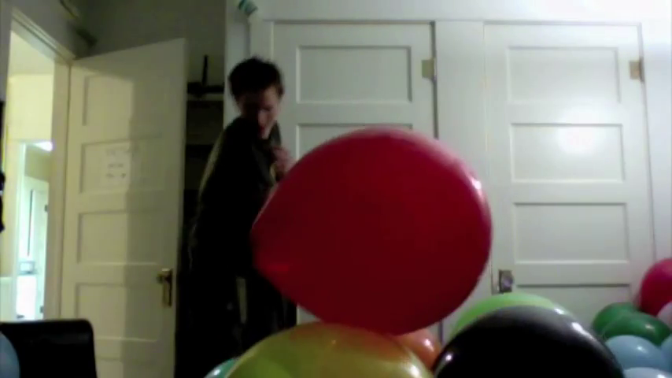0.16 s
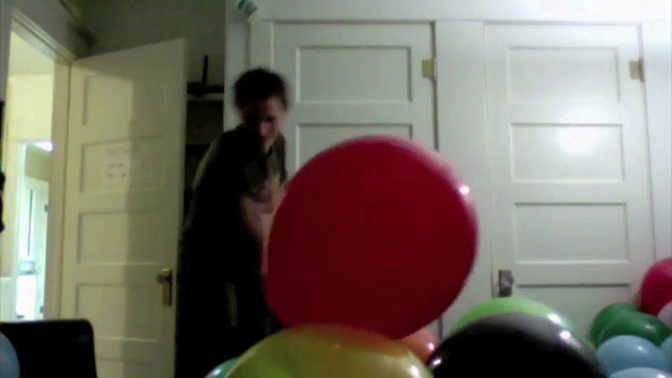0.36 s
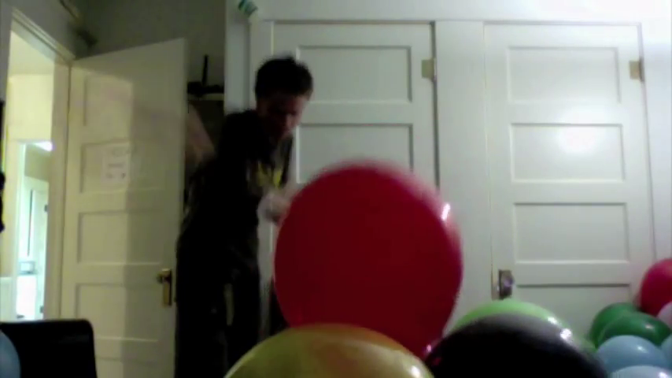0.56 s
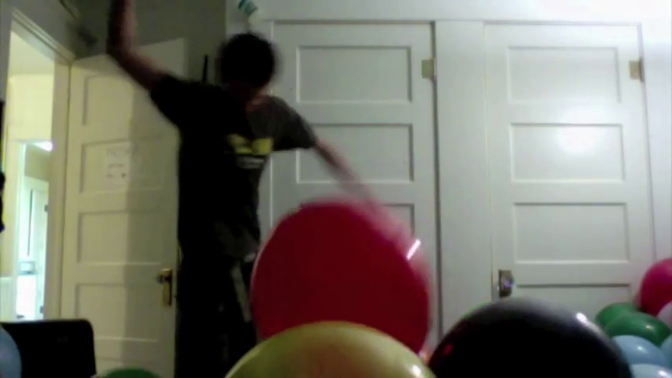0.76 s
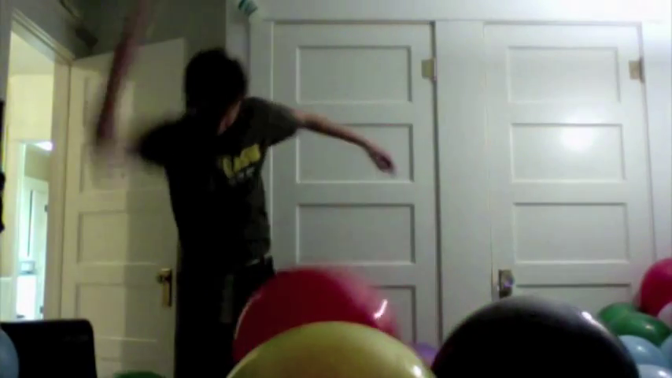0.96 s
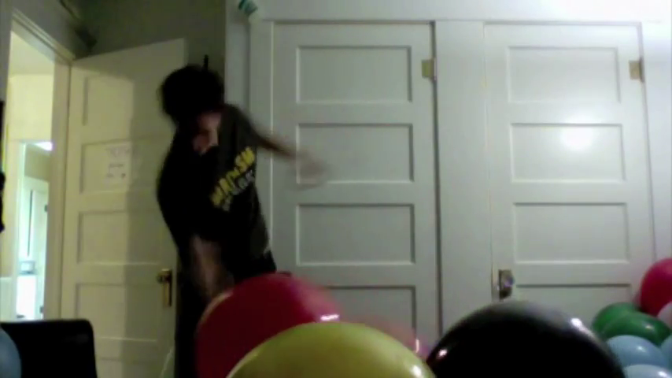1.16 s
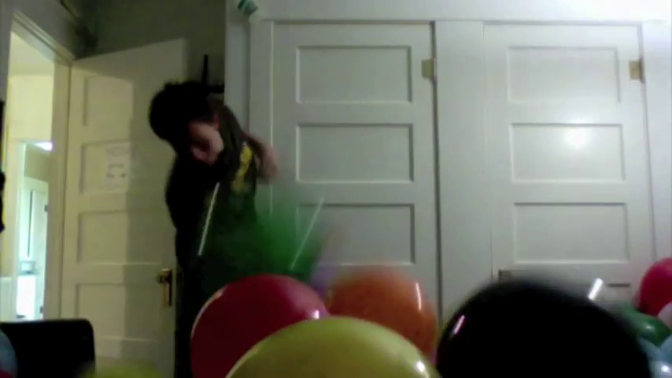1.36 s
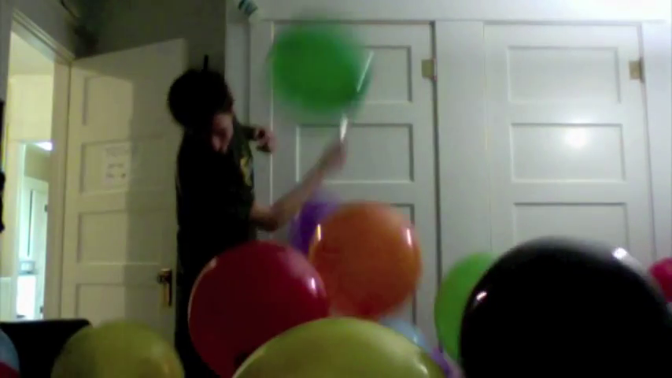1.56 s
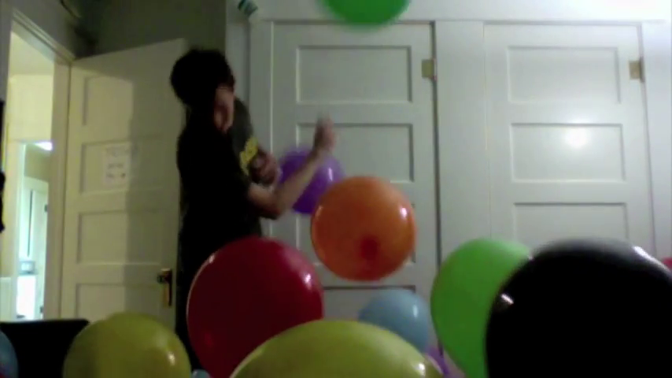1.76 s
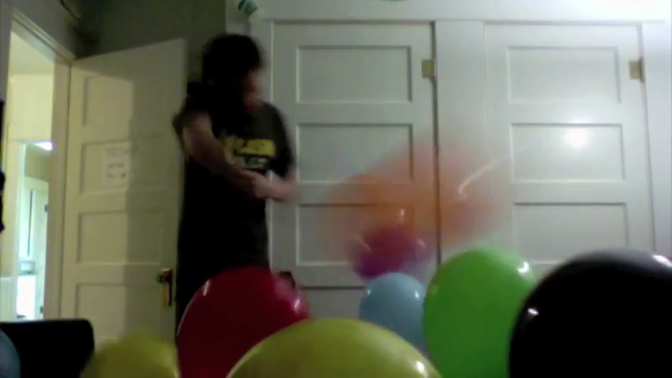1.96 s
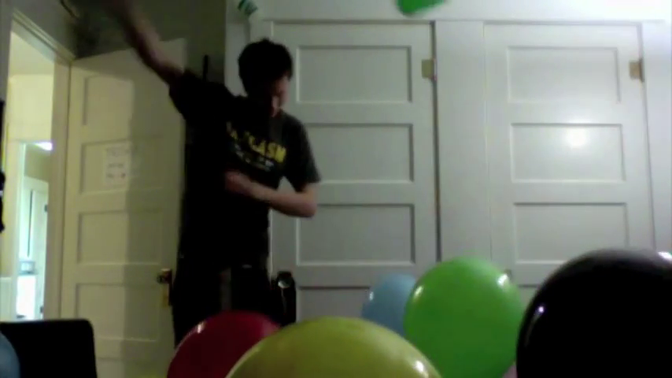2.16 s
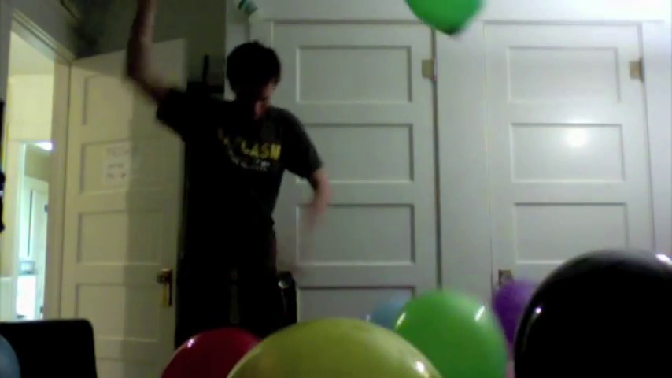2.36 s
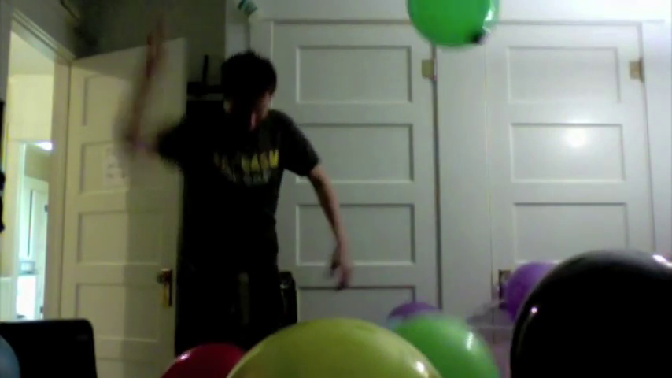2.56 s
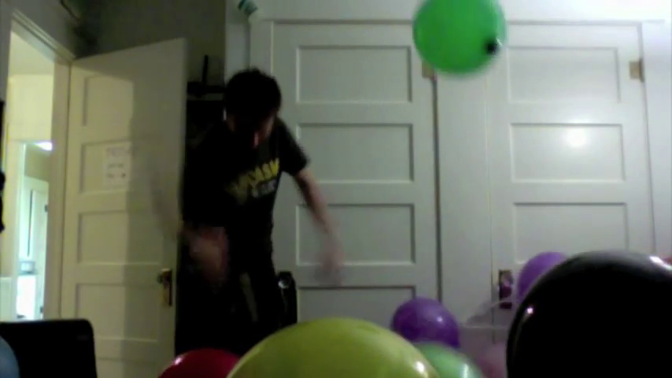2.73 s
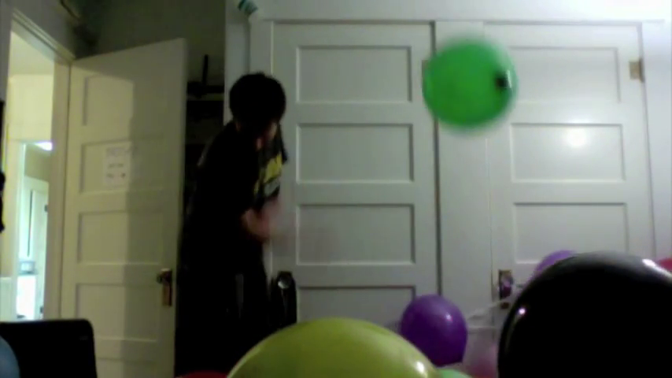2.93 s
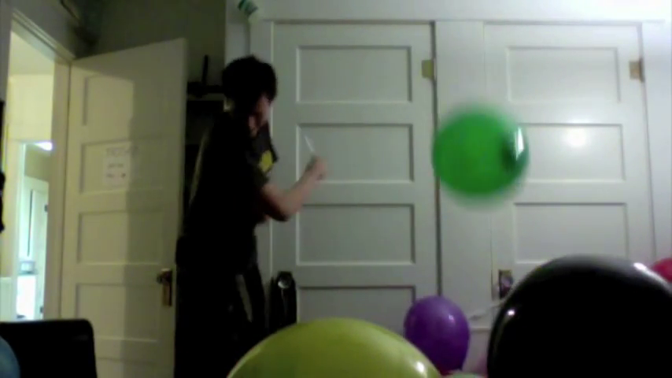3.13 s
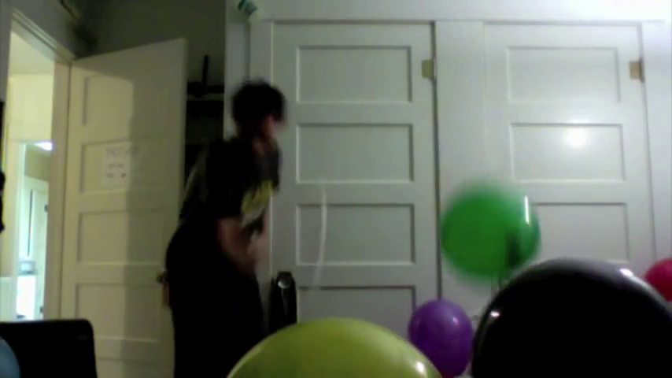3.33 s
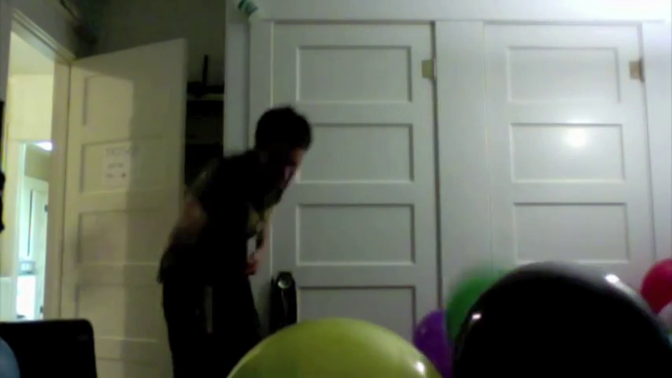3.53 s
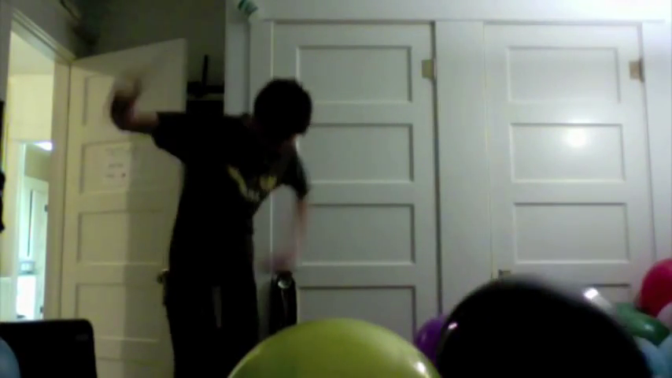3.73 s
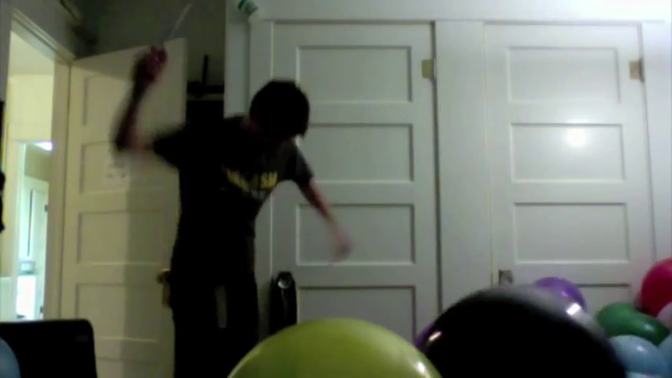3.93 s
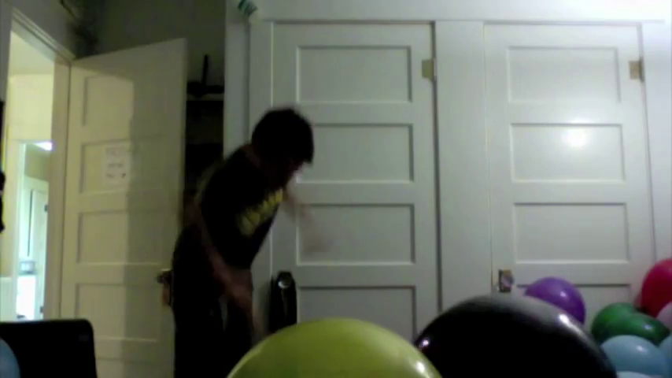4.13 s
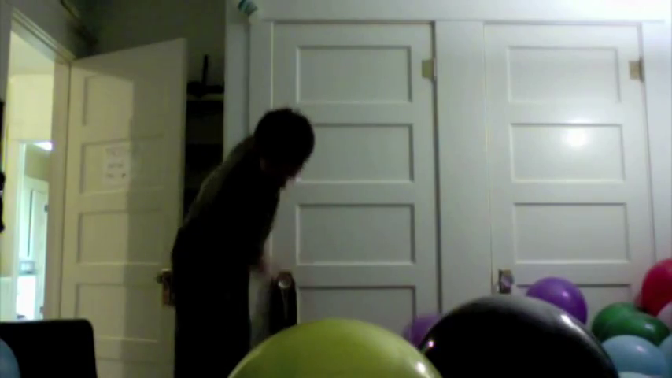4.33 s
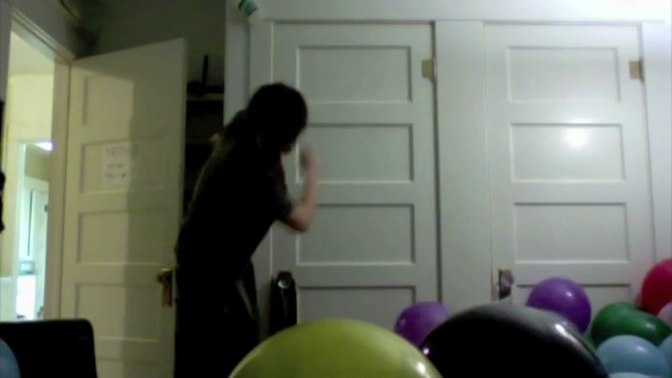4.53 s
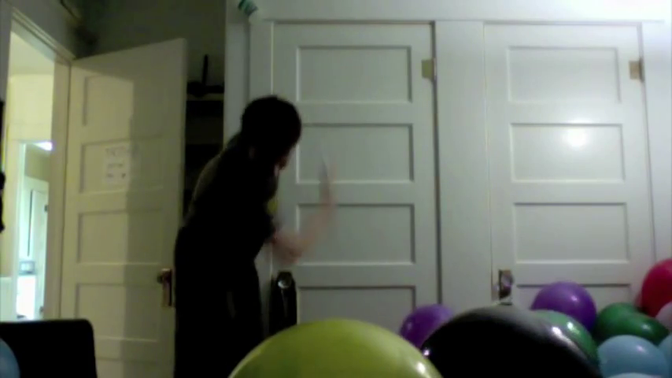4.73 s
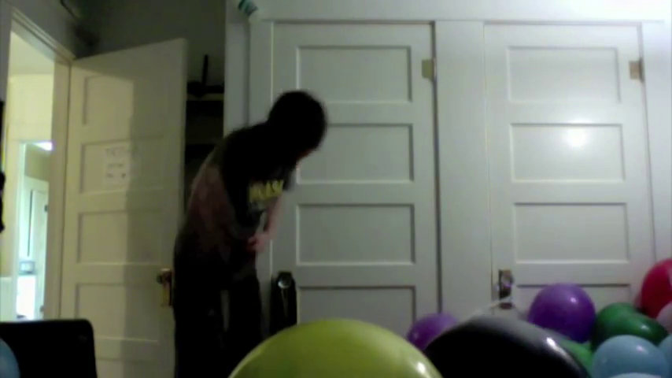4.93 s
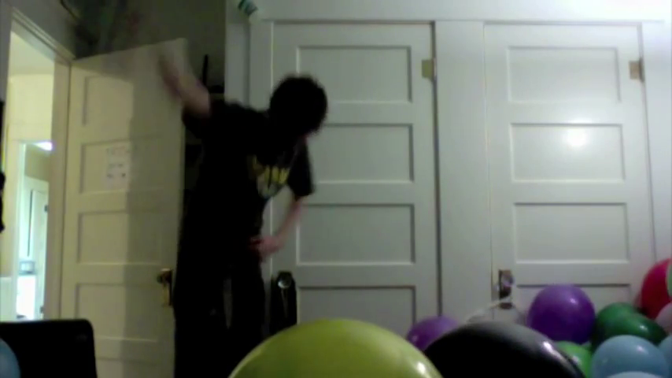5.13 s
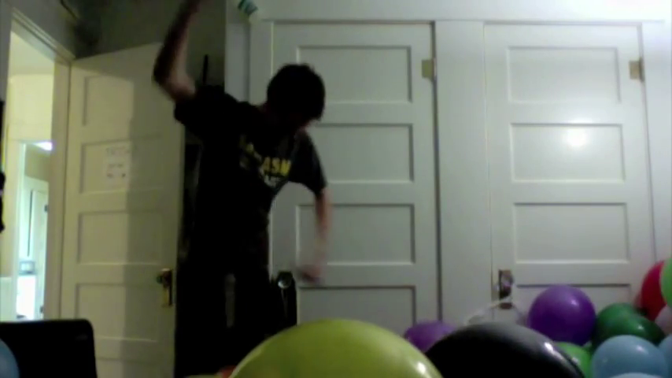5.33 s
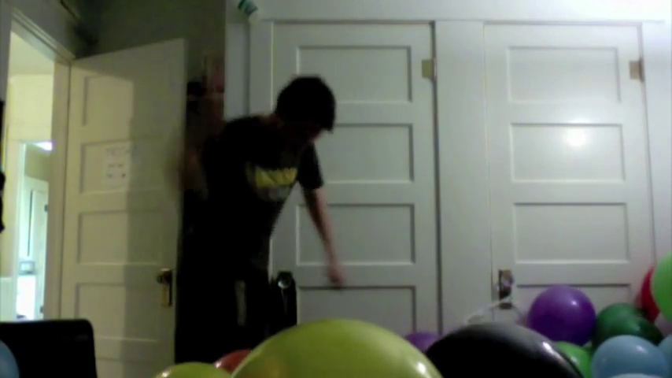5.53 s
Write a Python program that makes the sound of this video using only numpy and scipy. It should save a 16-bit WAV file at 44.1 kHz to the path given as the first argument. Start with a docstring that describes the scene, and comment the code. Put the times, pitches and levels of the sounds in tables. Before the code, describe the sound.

In a small, hard-walled room, someone bursts balloons one by one. A loud crack opens, a weaker boomy pop and a much fainter one follow, then three loud bangs, another weak pop and the loudest last. Soft hollow bumps and brief rubs fill the gaps. A small microphone a short way off distorts on the big bangs.

```python
"""A small room with hard doors and walls, where balloons are punched and burst one after another.
Each blow slaps the skin (ringing step), the latex tears up to 11 ms later and the bang (coloured echoes) fills
the room, overloading a small microphone. The louder a balloon bursts, the brighter and longer it sounds.
In between, loose balloons bump (decaying sines) and rub, and clothes and feet scuff (band-passed grains)."""
import sys
import numpy as np
from scipy import signal
from scipy.fft import rfft, irfft, next_fast_len
from scipy.io import wavfile
from scipy.ndimage import uniform_filter1d

SR = 44100
rng = np.random.default_rng(int(sys.argv[2]) if len(sys.argv) > 2 else 0)


def wrap_up_sound(samples):
    """Save the sound to the file named by the first command line argument, as 16-bit audio."""
    columns = np.atleast_2d(samples).T
    # keep every value between -1 and 1, then stretch to whole-number steps
    tamed = np.clip(columns, -1, 1)
    steps = np.round(tamed * 32767).astype(np.int16)
    wavfile.write(sys.argv[1], SR, steps)


N = 250752


def from_db(db):
    """Decibels to gain."""
    return np.exp(np.asarray(db) * (np.log(10) / 20))


def rms_one(x):
    """Scale to an rms of 1."""
    return x / np.sqrt(np.mean(x ** 2) + 1e-20)


def at_hz(points, hz):
    """Read a table on a log-frequency axis."""
    known_hz, values = np.transpose(points)
    return np.interp(np.log(hz), np.log(known_hz), values)


def bins(size):
    """Frequencies of an FFT, kept above zero."""
    return np.maximum(np.fft.rfftfreq(size, 1 / SR), 1)


AGE = np.arange(SR) / SR   # s since an onset, for 1 s
HZ = bins(SR)


def hump(hz, centre_hz, octaves):
    """A bell of height 1 on a log-frequency axis."""
    return np.exp(-.5 * (np.log2(hz / centre_hz) / octaves) ** 2)


def decay(t60_s):
    """Exponential decay that falls 60 dB in t60_s."""
    return from_db(-60 * AGE / t60_s)


def coloured(x, curve_db):
    """Causal (minimum-phase) filter with a gain in dB for each FFT bin, by folding the cepstrum."""
    half = len(x) // 2
    cepstrum = irfft(np.log(from_db(curve_db)), len(x))
    cepstrum[1:half] *= 2
    cepstrum[half + 1:] = 0
    return irfft(rfft(x) * np.exp(rfft(cepstrum)), len(x))


def unit_power(curve_db):
    """Shift a colour so that white noise keeps its level."""
    return curve_db - 10 * np.log10(np.mean(from_db(curve_db) ** 2))


def band(x, hz, octaves):
    """Band-pass that leaves white noise at its level."""
    half_span = 2 ** (octaves / 2)
    low, high = np.clip([hz / half_span, hz * half_span], 10, .45 * SR)
    sos = signal.butter(2, [low, high], "band", fs=SR, output="sos")
    return signal.sosfilt(sos, x) * np.sqrt(SR / 2 / (high - low))


def resonances_db(table):
    """Colour in dB of a set of resonances."""
    return sum(db / (1 + (2 * (HZ - hz) / width_hz) ** 2) for hz, width_hz, db in table)


def add(track, s, sound):
    """Mix a sound in at a time."""
    start = max(round(s * SR), 0)
    track[start:start + len(sound)] += sound[:max(N - start, 0)]


# background noise spectrum: (frequency [Hz], relative density [dB per Hz])
HISS_SPECTRUM = [(26, -61.5), (45, -32), (85, -17), (130, -2), (401, -8.5), (609, -6.5), (798, -16),
                 (971, -12), (1070, -19), (1340, -16), (1480, -16), (4350, -15.5), (7500, -17),
                 (13800, -37), (16000, -48.5)]
HISS_REST_DB = -66.5
# swell after a 0 dB bang, change per dB of bang, fall
SWELL_DB, SWELL_PER_DB, SETTLE_DB_PER_S = -60, -0.12, 21


def hiss():
    """Faint background noise that swells after each burst and settles again; powers add."""
    size, t = next_fast_len(N, real=True), np.arange(N) / SR
    power = from_db(HISS_REST_DB) ** 2
    for s, slap_db, delay_s, bang_db, *rest in POPS:
        swell_db = SWELL_DB + SWELL_PER_DB * bang_db - SETTLE_DB_PER_S * np.abs(t - s)
        power = power + (t > s) * from_db(swell_db) ** 2
    noise = rms_one(coloured(rng.standard_normal(size), at_hz(HISS_SPECTRUM, bins(size))))
    return np.sqrt(power) * noise[:N]


# reverberation at length 1: (frequency [Hz], t60 [s])
ROOM_DECAY = [(80, 0.34), (200, 0.31), (500, 0.34), (1200, 0.34), (3000, 0.33), (6000, 0.33), (11000, 0.29),
              (16000, 0.19)]


def echoes(length=1, count=12, sparse_db=7, mixing_s=0.02):
    """Wall reflections, level 1 at first: uneven spikes that merge into noise; each band has its own decay."""
    spread = np.log(from_db(sparse_db)) * np.exp(-AGE / mixing_s)
    sizes = np.exp(spread * np.clip(rng.standard_normal(SR), -3, 3) - spread ** 2)
    spectrum, out = rfft(sizes * rng.standard_normal(SR)), 0
    centres_hz = np.geomspace(80, 16000, count)
    for hz, share in zip(centres_hz, np.eye(count)):
        crossfade = np.interp(np.log(HZ), np.log(centres_hz), share)
        t60_s = length * at_hz(ROOM_DECAY, hz)
        out = out + irfft(spectrum * crossfade, SR) * np.exp(-np.log(1000) * AGE / t60_s)
    return out


# resonances of rubbed latex: (frequency [Hz], width [Hz], height [dB])
SKIN_MODES = [(759.4, 150, 8.5), (1590, 220, 6), (3200, 300, 0.5)]
# rubs of latex, cloth and feet: (time [s], level [dB], stroke time constant [s], centre [Hz], width [octaves])
SCUFF_EVENTS = [(0.107, -63.5, 0.053, 537, 0.37), (0.127, -60.5, 0.014, 4400, 2.5),
                (0.275, -64.5, 0.02, 820, 1), (1.288, -51.5, 0.035, 6000, 2.3),
                (1.848, -53, 0.025, 1306, 3.6), (2.465, -54.5, .032, 5460, 2.4),
                (2.637, -48, 0.025, 1800, 1.22), (2.638, -53, .018, 9500, 1.8),
                (3.154, -61, 0.019, 1563, 0.34), (3.698, -35.5, 0.0061, 1500, 2.53),
                (3.734, -51, 0.021, 3260, .13), (3.769, -49, 0.0063, 1045, 1.7),
                (3.834, -56.5, 0.0072, 9440, 1.04), (3.873, -58.5, 0.0062, 1400, 1.4),
                (4.016, -54, .008, 1700, 1), (4.085, -55.5, 0.014, 1700, 2.1),
                (5.086, -49, 0.0049, 1090, 2.4)]


def scuffs(near_db=0, room_db=-6, grain_db=5):
    """A short rub of uneven grains with its reverberation, coloured by the latex."""
    out, walls, skin_db = np.zeros(N), echoes(), resonances_db(SKIN_MODES)
    for s, db, stroke_s, hz, octaves in SCUFF_EVENTS:
        stroke = AGE / stroke_s * np.exp(1 - AGE / stroke_s)
        grain_sizes = from_db(grain_db * rng.standard_normal(SR))
        near = rms_one(rng.standard_normal(SR) * grain_sizes) * stroke
        reverb = walls * (1 - np.exp(-AGE / stroke_s))
        sound = from_db(near_db) * near + from_db(room_db) * reverb
        add(out, s, from_db(db) * coloured(band(sound, hz, octaves), skin_db))
    return out


def slap(ring_hz=450, t60_s=0.025, skin_db=-17, skin_s=0.045, skin_hz=2500):
    """The hand meets the taut skin: a pressure step that rings briefly, with a little rasp."""
    swing = np.cos(2 * np.pi * ring_hz * AGE) * decay(t60_s)
    b, a = signal.butter(1, skin_hz, fs=SR)
    rasp = rms_one(signal.lfilter(b, a, rng.standard_normal(SR)))
    return from_db(skin_db) * rasp * np.exp(-AGE / skin_s) - swing


# bang of tearing latex: (frequency [Hz], relative density [dB per Hz])
BANG_SPECTRUM = [(50, -17.5), (120, 1), (250, 3.5), (450, 4), (800, 2), (1250, -2.5), (2000, 0), (4000, -3),
                 (8000, -9), (12000, -13), (16000, -15)]
# resonances of the room: (frequency [Hz], width [Hz], height [dB])
ROOM_MODES = [(130, 17, 2.5), (219, 62, 3.5), (278, 22, 4), (369.6, 66, 4.5), (471, 57, 5), (600, 100, 3.5),
              (690, 30, 1.5), (885, 14, 2), (1520, 90, 1), (2000, 81, 1.5)]
# tilt above 500 Hz for a 0 dB bang, change per dB of bang
TILT_DB_PER_OCTAVE, TILT_PER_DB = -0.45, 0.12
CAVITY_DB = 4.5   # lift at the pitch of the balloon's cavity


def bang_colour(bang_db, boom_db, cavity_hz, crack_hz, crack_db,
                boom_hz=130, boom_octaves=0.5, cavity_octaves=0.2, crack_octaves=0.43):
    """Spectrum of one burst in the room: brighter when louder, with humps for boom, cavity and crack."""
    tilt_db = (TILT_DB_PER_OCTAVE + TILT_PER_DB * bang_db) * np.log2(np.maximum(HZ / 1000, .5))
    humps_db = (boom_db * hump(HZ, boom_hz, boom_octaves)
                + CAVITY_DB * hump(HZ, cavity_hz, cavity_octaves)
                + crack_db * hump(HZ, crack_hz, crack_octaves))
    return unit_power(at_hz(BANG_SPECTRUM, HZ) + resonances_db(ROOM_MODES) + tilt_db + humps_db)


# 0 dB bang, change per dB of bang
RING_LENGTH, RING_PER_DB = 1, 0.02   # share of the room's t60
SNAP_DB, SNAP_PER_DB = -16.5, 1.6   # skin snapping back
# bursts: (time [s], slap level [dB], tear delay [s], bang level [dB], air blast level [dB],
#          build-up time constant [s], boom lift [dB], cavity [Hz], crack [Hz], crack lift [dB])
POPS = [(0.4802, -14, .0058, 6, -4, 0.0051, -2.5, 271.2, 2420, 4.5),
        (1.1678, -23, 0.0027, -5.5, -28, 0.025, 12.5, 199, 1550, 2.5),
        (1.9550, -16, .0002, -15, -21, 0.0026, 9.5, 400, 930, 1),
        (2.7461, -17, .0074, 3, 1.5, .0073, -2, 349.2, 2940, 2),
        (3.421, -14, .0022, 2, 1, 0.0022, -3, 640, 1780, .5),
        (4.1705, -14, .011, 7, 3, 0.035, 0, 380, 1547, 2),
        (4.8648, -23, .0063, -16, -26, .013, 16, 520, 2650, 4),
        (5.6180, -11.5, .0070, 8, 9, 0.0062, 2, 435.4, 2390, 4)]


def pops(blast_hz=440, blast_t60_s=0.026, first_share=0.32, snap_t60_s=0.14, snap_octaves=0.25):
    """The freed air swings in and out, the skin snaps back, the crack's reflections pile up and die away."""
    out = np.zeros(N)
    for s, slap_db, delay_s, bang_db, blast_db, build_s, boom_db, cavity_hz, crack_hz, crack_db in POPS:
        # bodies and balloons shade the direct path, so the level takes a moment to build
        swell = 1 - (1 - first_share) * np.exp(-(AGE / build_s) ** 2)
        walls = echoes(RING_LENGTH + RING_PER_DB * bang_db) * swell
        colour_db = bang_colour(bang_db, boom_db, cavity_hz, crack_hz, crack_db)
        bang = from_db(bang_db) * coloured(walls, colour_db)
        blast = from_db(blast_db) * decay(blast_t60_s) * np.cos(2 * np.pi * blast_hz * AGE)
        snap_noise = band(rng.standard_normal(SR), crack_hz, snap_octaves)
        snap = from_db(SNAP_DB + SNAP_PER_DB * bang_db) * decay(snap_t60_s) * snap_noise
        add(out, s, from_db(slap_db) * slap())
        add(out, s + delay_s, bang + blast + snap)
    return out


def booms(mode_hz=126, mode_db=-17, rise_s=0.099, t60_s=0.27):
    """Each bang sets the lowest standing wave of the room swinging."""
    out = np.zeros(N)
    swing = (1 - np.exp(-AGE / rise_s)) * decay(t60_s) * np.sin(2 * np.pi * mode_hz * AGE)
    for s, slap_db, delay_s, bang_db, blast_db, build_s, boom_db, *rest in POPS:
        add(out, s + delay_s, from_db(bang_db + boom_db + mode_db) * swing)
    return out


HUM_DB, HUM_PER_DB = -26, .5   # after a 0 dB bang, change per dB of bang


def hums(pitch_hz=440, octaves=.3, rise_s=.03, t60_s=0.45):
    """Each bang sets the whole balloons humming, a cluster of close pitches made of narrow noise."""
    out = np.zeros(N)
    envelope = (1 - np.exp(-AGE / rise_s)) * decay(t60_s)
    for s, slap_db, delay_s, bang_db, *rest in POPS:
        hum = envelope * band(rng.standard_normal(SR), pitch_hz, octaves)
        add(out, s + delay_s, from_db(HUM_DB + HUM_PER_DB * bang_db) * hum)
    return out


BUMP_CYCLES = 28   # swings until the hum is 60 dB down
OVERTONE_RATIO, OVERTONE_DB = 1.5, -12.5   # second mode of the air in a round balloon
# soft bumps on whole balloons: (time [s], level [dB], pitch [Hz])
BUMP_EVENTS = [(1.095, -34.5, 438), (1.586, -45, 434), (1.6, -37.5, 451), (1.608, -35, 120.3),
               (1.64, -38.5, 116), (1.824, -38, 476), (1.851, -27.5, 459), (1.867, -32, 150),
               (2.588, -37, 189), (2.643, -31.5, 169), (3.858, -38, 948), (3.859, -34, 587),
               (3.982, -37.5, 215), (4.045, -41.5, 598), (5.044, -42, 140.4), (5.086, -40.5, 734)]


def bumps(contact_s=0.0017, room_db=-16, thud_db=-16, thud_octaves=2.0):
    """A nudged balloon hums at its own pitch, longer when low, and sends a dull thud round the room."""
    out, walls = np.zeros(N), echoes()
    room_response = rfft(walls / np.linalg.norm(walls))
    contact = 1 - np.exp(-AGE / contact_s)
    for s, db, hz in BUMP_EVENTS:
        phase = 2 * np.pi * hz * AGE
        modes = np.sin(phase) + from_db(OVERTONE_DB) * np.sin(OVERTONE_RATIO * phase)
        hum = contact * decay(BUMP_CYCLES / hz) * modes
        wet = irfft(rfft(hum) * room_response, SR)
        thud = band(walls * contact, hz, thud_octaves)
        add(out, s, from_db(db) * (hum + from_db(room_db) * wet + from_db(thud_db) * thud))
    return out


def scene():
    """Everything reaches one microphone."""
    return (hiss_free_mix := scuffs() + pops() + booms() + hums() + bumps())[None]


def suppressor(x, split_hz=4500, threshold_db=-62, deepest_db=-8, window_samples=600):
    """Noise suppression: treble is turned down as it sinks towards the threshold, which shortens its tails."""
    bass = signal.sosfiltfilt(signal.butter(2, split_hz, fs=SR, output="sos"), x)
    treble = x - bass
    power = np.abs(uniform_filter1d(treble ** 2, window_samples))
    openness = power / (power + from_db(threshold_db) ** 2)
    return bass + treble * from_db(deepest_db * (1 - openness))


# colour of the microphone: (frequency [Hz], gain [dB])
MIC_RESPONSE = [(30, -31), (65, -23), (115, -5.5), (250, -2.5), (450, 0.5), (700, 0), (1200, -0.5),
                (2200, -1.5), (6000, 0.5), (16000, -0.5)]


def record(dry, overload_db=-6.5, knee=11.0, low_cut_hz=75, cutoff_hz=16100):
    """The capsule overloads and loses bass, hiss joins and is partly suppressed, peaks and top are cut."""
    size = next_fast_len(N + SR // 2, real=True)
    drive = np.pad(dry[0], (0, size - N)) / from_db(overload_db)
    flattened = from_db(overload_db) * drive / (1 + np.abs(drive) ** knee) ** (1 / knee)
    voiced = coloured(flattened, at_hz(MIC_RESPONSE, bins(size)))[:N] + hiss()
    lean = signal.sosfilt(signal.butter(3, low_cut_hz, "high", fs=SR, output="sos"), voiced)
    capped = np.clip(suppressor(lean), -.95, .95)
    top_cut = signal.ellip(10, .2, 80, cutoff_hz, fs=SR, output="sos")
    return signal.sosfilt(top_cut, capped)[None]


dry = scene()
out = record(dry)
wrap_up_sound(out)
```